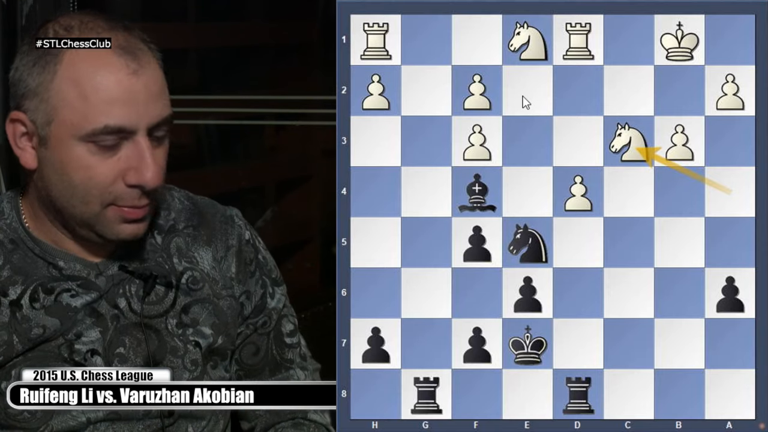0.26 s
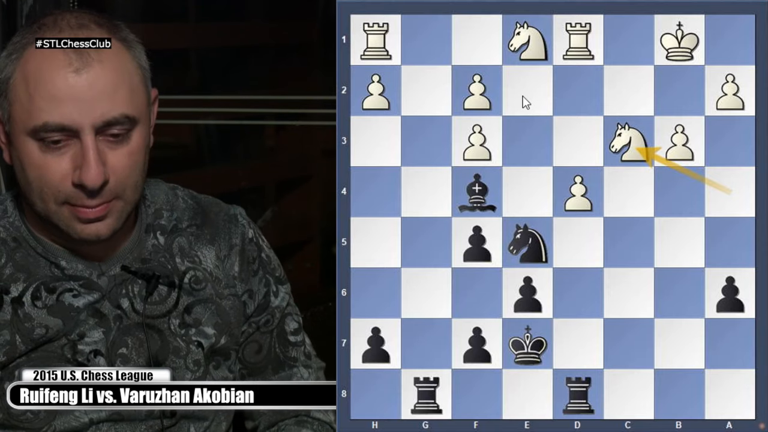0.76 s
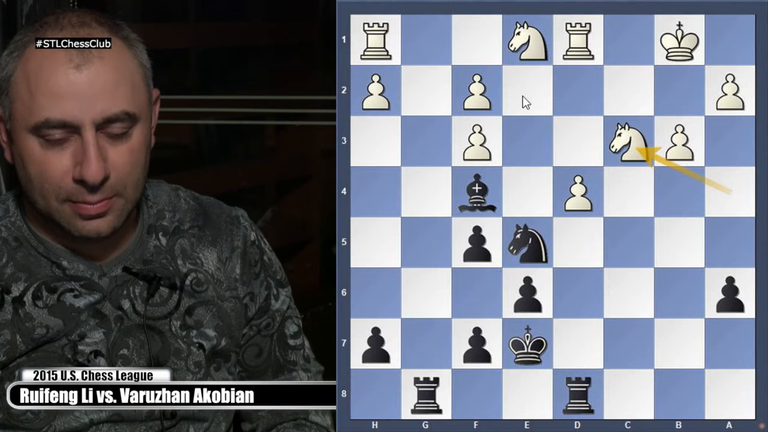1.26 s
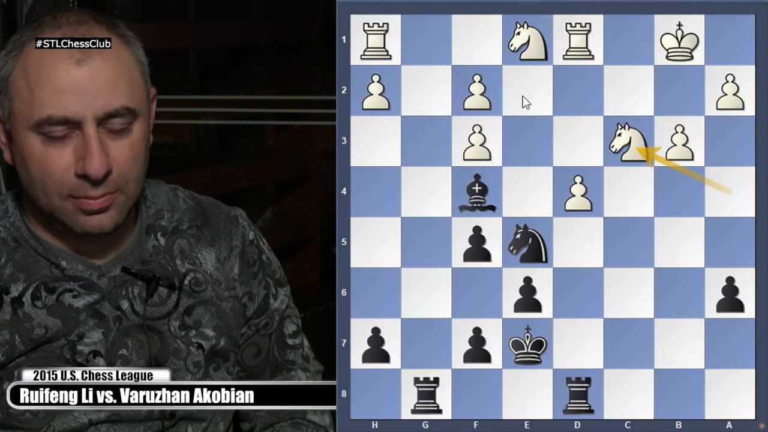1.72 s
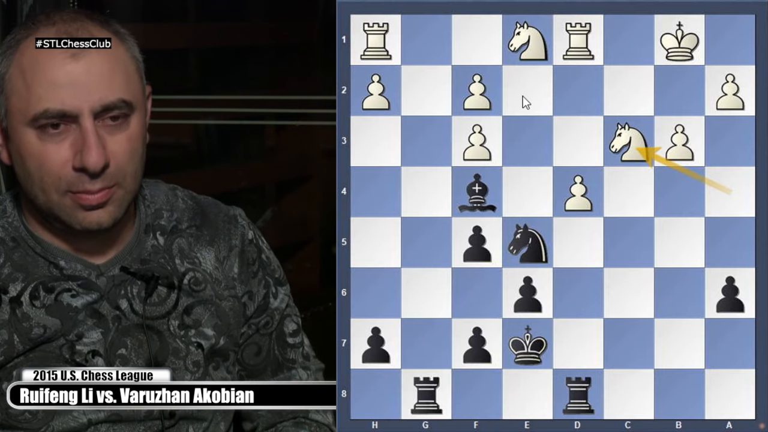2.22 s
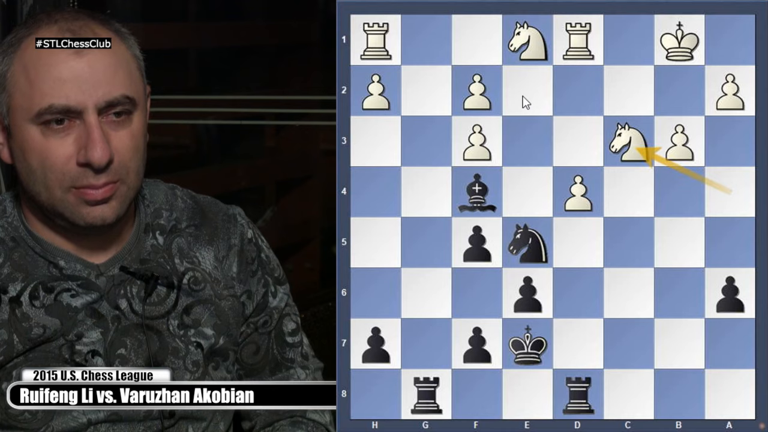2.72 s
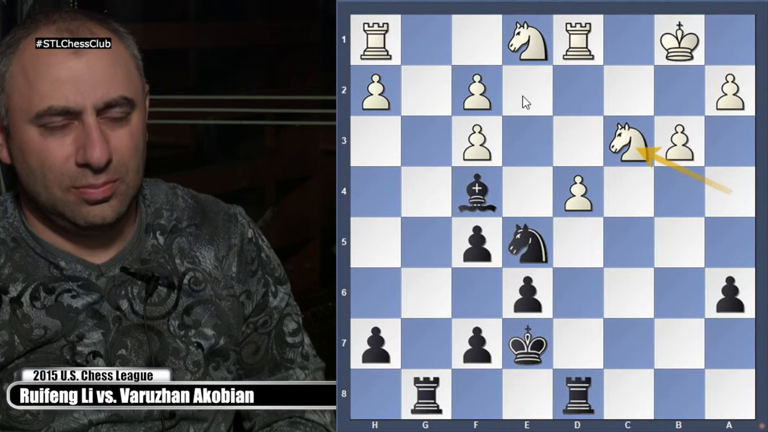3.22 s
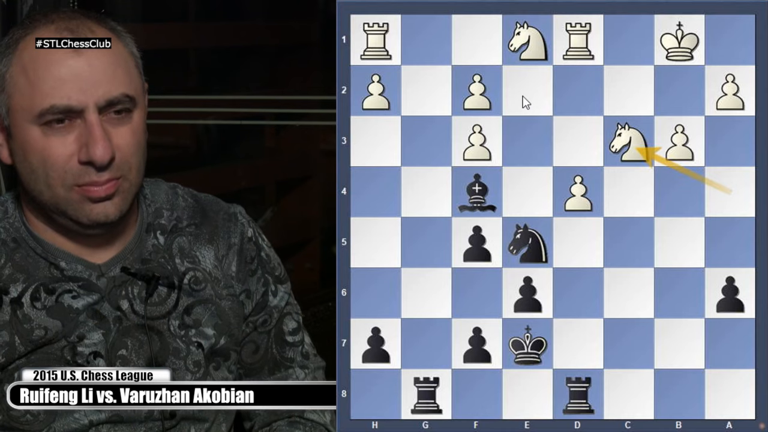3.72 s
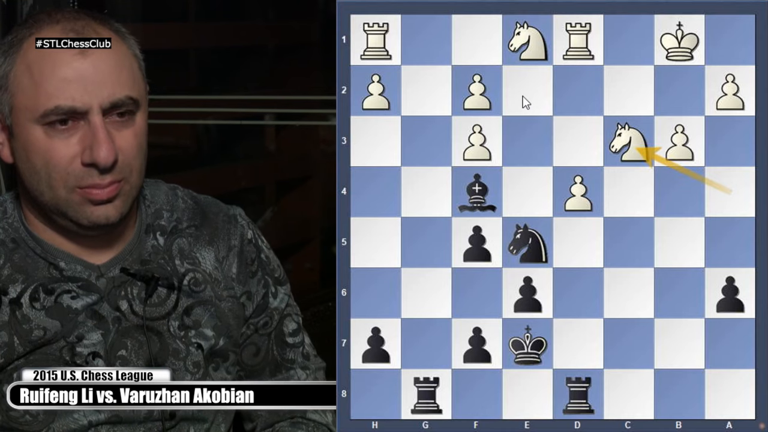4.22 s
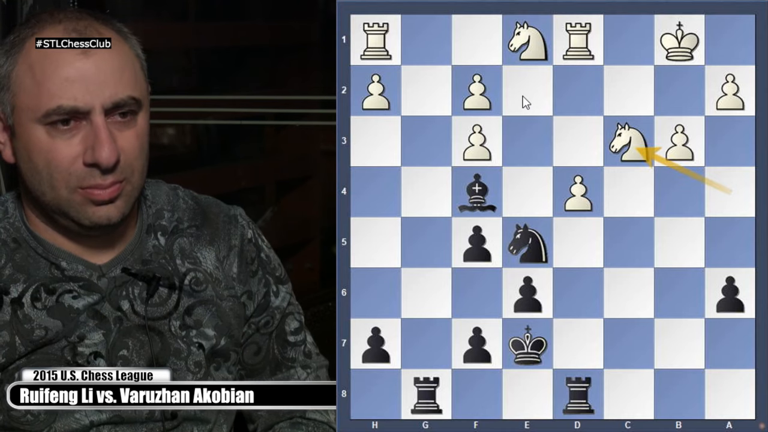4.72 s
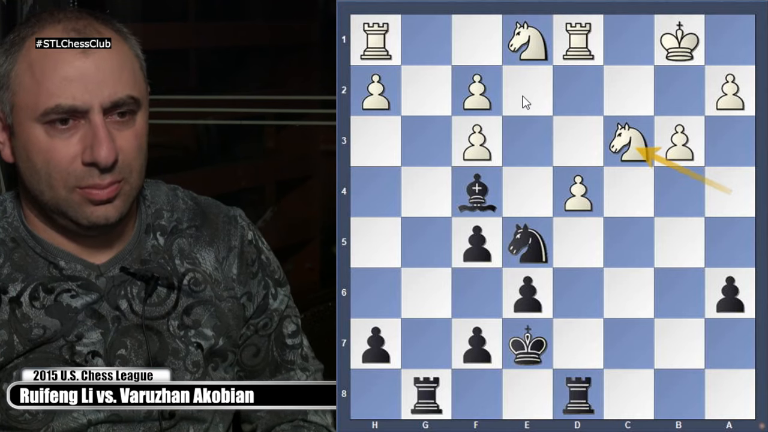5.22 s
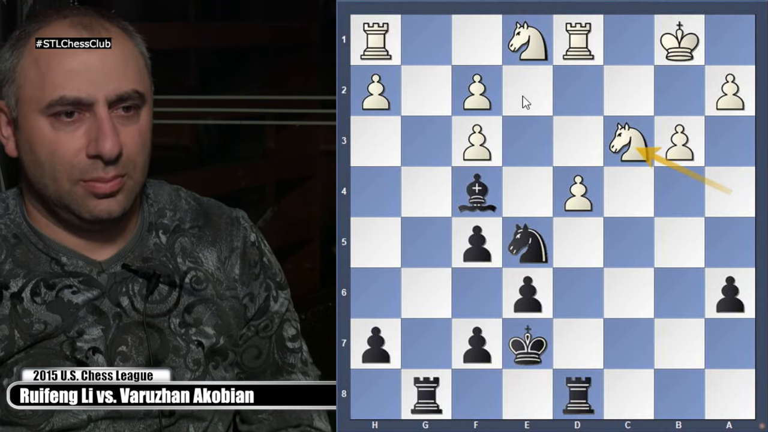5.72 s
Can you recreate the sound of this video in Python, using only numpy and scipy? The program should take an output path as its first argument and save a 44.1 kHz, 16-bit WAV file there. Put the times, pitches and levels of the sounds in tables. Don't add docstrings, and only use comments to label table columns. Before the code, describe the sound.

Over a low ventilation rumble, fingers softly tap and rub a sealed drink can. The tab clicks and a short bright gas burst escapes; after a pause another click starts a faint hiss with small metallic ticks. The lid breaks with a loud, clipped pop, ringing briefly in the room, then the slack can wall crinkles and dents. Close mono microphone.

```python
import sys
import numpy as np
from scipy import signal
from scipy.fft import rfft, irfft
from scipy.io import wavfile

SR = 44100
rng = np.random.default_rng(int(sys.argv[2]) if len(sys.argv) > 2 else 0)


def bounce(signal):
    frames = np.transpose(np.atleast_2d(signal))
    limited = np.clip(frames, -1, 1)
    pcm = np.round(limited * 32767).astype(np.int16)
    wavfile.write(sys.argv[1], SR, pcm)


def ratio_of_db(decibels):
    return 10 ** (np.asarray(decibels, float) / 20)


N = 262836

# [freq_hz, density_db_per_hz]
AIR_COLOUR = [(9.4, -26.5), (16, 5), (49, 0.5), (118, -19), (192, -22.5), (264, -21), (374, -28),
              (471, -26), (666, -33), (1090, -36.5), (2310, -47), (3260, -46.5), (4750, -52), (14700, -60),
              (16000, -68)]
AIR_LEVEL_DB = -38
# [freq_hz, t60_s]
ROOM_T60 = [(300, .5), (1300, .7), (2000, .78), (3000, .85), (4500, .65), (6000, .58), (9000, .57),
            (14000, .42)]
ROOM_DB, ROOM_GAP_S, EARLY_DB, EARLY_T60_S = -20, .002, 3, .2

# [freq_hz, width_hz, level_db]
RUB_RESONANCES = [(900, 700, -1), (2000, 900, -4), (3100, 900, -1), (4202, 1000, -6)]
# [start_s, length_s, friction_db, rustle_over_friction_db]
STROKES = [(.29, .005, -69, -1), (.37, .005, -76, 8), (.66, .1, -70, -15), (.83, .015, -57, -11),
           (.87, .17, -64, -6), (1.865, .045, -57, -9), (2.19, .04, -69, 0), (3.05, .55, -66, -10),
           (3.27, .06, -63, -7), (4.56, .05, -61, -6), (4.62, .05, -70, -5), (5.22, .01, -64, -8),
           (5.63, .01, -58, -14), (5.91, .07, -73, 3)]
GRIP_DB_PER_S, SLIP_DB_PER_S = 350, 200
# [start_s, length_s, level_db]
THUMP = (3.718, .03, -40.5)
THUMP_DB_PER_S = 900

# [freq_hz, width_hz]
SEALED_METAL = [(1700, 1600), (3800, 1900), (5300, 3000), (10800, 7000)]
# [freq_hz, width_hz]
SLACK_METAL = [(1700, 900), (2850, 950), (6000, 2000), (11000, 8000)]
# [start_s, knock_db, brightness_db, boom_over_knock_db]
TAPS = [(.364, -53, 0, 0), (.8243, -49, 0, -5), (1.87, -67, 8, 3), (1.9052, -43, -4, -22),
        (4.519, -78, 6, 36), (5.6179, -52, -9, -4)]
TAP_SIZZLE_DB, TAP_T60_S = -10, .04
# [start_s, knock_db, brightness_db, boom_over_knock_db]
DENTS = [(4.5427, -46, -11, -8), (4.5504, -41, -2, -6), (4.554, -43, -5, -7), (4.563, -46, -10, -6),
         (4.573, -47, -5, -7), (4.587, -42, -10, -8), (4.594, -35, -5, -6), (4.606, -44, -4, -3),
         (4.7968, -51, 0, -4), (5.0415, -42, -6, 7), (5.1352, -36, -11, -14), (5.1916, -34, -20, -6),
         (5.2236, -45, -11, -7), (5.4716, -28, -7, -8), (5.5201, -49, -13, -3), (5.5859, -48, -11, -24),
         (5.6415, -36, -18, -8), (5.6458, -29, -22, -14), (5.6658, -35, -21, -15), (5.7687, -62, 4, 0)]
DENT_SIZZLE_DB, DENT_T60_S = -11, .015
# [start_s, knock_db, brightness_db, sizzle_over_tick_db]
TICKS = [(1.0639, -33, 20, -18), (1.2133, -5, -10, -6), (1.2385, -18, -14, 0), (2.19, -54, 4, -10),
         (2.225, -54, 6, -10), (2.5694, -33, -8, -16), (2.5745, -23, -9, -12), (2.5874, -9, 5, -6),
         (2.6101, -20, 2, -16), (2.782, -47, 3, -3), (2.794, -45, 3, -10), (2.891, -38, -8, -4),
         (3.1585, -33, -4, -11), (3.2828, -36, -2, -9), (3.3577, -39, -5, -11), (3.6333, -29, -1, -7),
         (3.657, -37, -2, -9), (3.693, -25, -3, -5), (3.7583, -23, -1, 1), (3.7738, -27, 4, -2),
         (3.8226, -22, -3, -3), (3.8301, -26, 2, -3), (3.8379, -17, -3, -3)]
TICK_BOOM_DB, TICK_T60_S = -12.5, .01
# [start_s, freq_hz, level_db, t60_s]
RINGS = [(1.064, 5850, -22, .025), (1.064, 4490, -24, .015), (1.064, 1750, -37, .02),
         (1.2134, 570, -39, .04), (1.2385, 570, -37, .06), (2.5875, 590, -37, .04), (2.5745, 590, -41, .04),
         (2.5875, 12600, -18, .008), (3.774, 3500, -17, .025), (3.774, 3600, -35, .12),
         (4.519, 700, -45, .04), (4.55, 1650, -47, .15), (4.59, 1600, -46, .17), (4.594, 3200, -42, .1),
         (4.594, 6200, -52, .2), (5.0415, 1760, -42, .12), (5.0415, 1000, -46, .04),
         (5.4716, 2150, -29, .015), (5.135, 3100, -35, .025), (5.1916, 3130, -42, .05),
         (5.6415, 1690, -47, .06), (5.6415, 2650, -37, .05), (5.6458, 3340, -39, .03),
         (5.6658, 2740, -42, .04)]
MODE_SPREAD, MODE_RISE_S = .03, .0006

# [time_s, level_db]
VENT = [
    (1.1845, -55),
    (1.188, -34),
    (1.205, -26.5),
    (1.245, -25.5),
    (1.29, -44),
    (1.35, -62),
    (1.4, -80),
]
# [freq_hz, density_db_per_hz]
VENT_COLOUR = [(600, -32), (1600, -21), (2500, -16), (3400, -4), (4800, -2.5), (6800, -2), (9000, -1),
               (11500, -4), (15000, 0), (16500, -2)]
# [start_s, length_s, level_db, rise_db_per_s, fall_db_per_s]
BLEED = (1.29, .02, -51, 600, 95)
# [freq_hz, density_db_per_hz]
SPIT_COLOUR = [(1500, -22), (2500, -8), (4300, 0), (6200, 0), (8500, -4), (11500, -5), (13500, -13),
               (16000, -22)]
SPIT_FROM_S, SPIT_DB, SPIT_DB_PER_S = 2.58, -24, 420
# [start_s, length_s, level_db]
LEAK = (2.59, .385, -47.5)
LEAK_RISE_DB_PER_S, LEAK_CLOSE_DB_PER_S = 5000, 320
# [freq_hz, width_hz, level_db]
SLIT = [(2200, 700, -15), (3220, 800, -11), (4300, 700, -16), (5200, 700, -11), (6300, 800, -6),
        (7800, 1300, -6.5), (9300, 600, -17), (10600, 1400, -8), (12700, 900, -10), (14100, 1100, -15),
        (15300, 900, -22)]
# [time_s, level_db, rise_db_per_s, fall_db_per_s]
HEADSPACE = (2.79, -46.5, 85, 65)
HEADSPACE_HZ, HEADSPACE_WIDTH_HZ = 640, 440

# [start_s, boom_db, knock_db, tick_db, sizzle_db, t60_s]
POP = (3.8406, -6, 3.5, 0, -2, .028)
# [freq_hz, level_db, t60_s]
LID_MODES = [(520, -18, .05), (1050, -19, .04), (1400, -12, .04), (1650, -16, .03), (2170, -12, .03),
             (2600, 1, .025), (3200, 9, .02), (3700, -8, .022), (6300, -4, .015)]
# [freq_hz, level_db]
BLAST = [(300, -20), (600, -13), (900, -10), (1300, -1), (1800, -7), (2500, -3), (3100, .5), (4000, -4),
         (4600, -9), (6300, -3), (8000, -10.5), (10000, -13), (13000, -18), (15500, -24)]
BLAST_DB = 39


def rms_one(x):
    return x / np.sqrt(np.mean(x ** 2) + 1e-20)


def add(out, sound, start_s):
    at = round(start_s * SR)
    out[at:at + len(sound)] += sound[:N - at]


def at_hz(points, hz):
    point_hz, value = np.transpose(points)
    return np.interp(np.log(np.maximum(hz, 1)), np.log(point_hz), value)


def coloured(spectrum):
    gain = ratio_of_db(at_hz(spectrum, np.fft.rfftfreq(N, 1 / SR)))
    return rms_one(irfft(rfft(rng.standard_normal(N)) * gain, N))


def resonate(x, hz, width_hz):
    r = np.exp(-np.pi * width_hz / SR)
    poles = [1, -2 * r * np.cos(2 * np.pi * hz / SR), r * r]
    return signal.lfilter([(1 - r * r) / 2, 0, (r * r - 1) / 2], poles, x)


def resonant_noise(rows):
    drive = rng.standard_normal(N)
    out = np.zeros(N)
    for k, (hz, width_hz, db) in enumerate(rows):
        band = resonate(resonate(drive, hz, width_hz), hz, width_hz)
        out += (-1) ** k * ratio_of_db(db) * band
    return rms_one(out)


def flutter(rate_hz, depth_db):
    r = np.exp(-2 * np.pi * rate_hz / SR)
    drift = signal.lfilter([1], [1, -2 * r, r * r], rng.standard_normal(N + SR))[SR:]
    return ratio_of_db(depth_db * rms_one(drift))


def swell(start_s, length_s, db, rise_db_per_s, fall_db_per_s):
    t = np.arange(N) / SR
    before_s = np.maximum(start_s - t, 0)
    after_s = np.maximum(t - start_s - length_s, 0)
    return ratio_of_db(db - rise_db_per_s * before_s - fall_db_per_s * after_s)


def ventilation():
    return ratio_of_db(AIR_LEVEL_DB) * coloured(AIR_COLOUR)


def room(x, size=40000):
    t = np.arange(size) / SR
    edges_hz = 200 * 2 ** np.arange(0, 6.6, 1 / 3)
    tail = np.zeros(size)
    for low, high in zip(edges_hz, edges_hz[1:]):
        band_filter = signal.butter(2, [low, high], "band", fs=SR, output="sos")
        band = signal.sosfilt(band_filter, rng.standard_normal(size))
        tail += band * ratio_of_db(-60 * t / at_hz(ROOM_T60, np.sqrt(low * high)))
    tail *= np.clip(t / ROOM_GAP_S - 1, 0, 1) * (1 + ratio_of_db(EARLY_DB - 60 * t / EARLY_T60_S))
    return signal.fftconvolve(x, tail / np.sqrt(np.sum(tail ** 2)))[:N]


def fingers():
    dull = resonant_noise(RUB_RESONANCES)
    fine = coloured([(3000, -28), (5000, -1.5), (7000, -4), (15000, -21)])
    grain = flutter(40, depth_db=2.4)
    out = swell(*THUMP, THUMP_DB_PER_S, THUMP_DB_PER_S) * resonant_noise([(160, 120, 0)])
    for start_s, length_s, db, rustle_db in STROKES:
        stroke = swell(start_s, length_s, db, GRIP_DB_PER_S, SLIP_DB_PER_S)
        out += grain * stroke * (dull + ratio_of_db(rustle_db) * fine)
    return out


def puff():
    time_s, level_db = np.transpose(VENT)
    burst = ratio_of_db(np.interp(np.arange(N) / SR, time_s, level_db, left=-150, right=-150))
    spits = swell(*BLEED)
    for start_s, knock_db, *_ in TICKS:
        if start_s > SPIT_FROM_S:
            spits += swell(start_s, 0, knock_db + SPIT_DB, 20000, SPIT_DB_PER_S)
    return (burst * coloured(VENT_COLOUR) + spits * coloured(SPIT_COLOUR)) * flutter(60, depth_db=1.2)


def leak():
    start_s, length_s, db = LEAK
    flow = swell(start_s, length_s, 0, LEAK_RISE_DB_PER_S, LEAK_CLOSE_DB_PER_S)
    jet = ratio_of_db(db) * flow * resonant_noise(SLIT) * flutter(30, depth_db=1.2)
    widest_s, hollow_db, rise, fall = HEADSPACE
    hollow = resonant_noise([(HEADSPACE_HZ, HEADSPACE_WIDTH_HZ, 0)])
    return jet + swell(widest_s, 0, hollow_db, rise, fall) * flow * hollow


def strike(metal, boom_db, knock_db, tick_db, sizzle_db, t60_s):
    t = np.arange(3000) / SR
    force = rng.standard_normal(len(t)) * (ratio_of_db(-60 * t / t60_s) + ratio_of_db(-22 - 60 * t / .04))
    force[0] = 3.0
    peaks_db = (boom_db - 3, knock_db + 1.5, tick_db + .8, sizzle_db + 2.5)
    out = np.zeros(len(t))
    for (hz, width_hz), db in zip(metal, peaks_db):
        band = resonate(resonate(force, hz, width_hz), hz, width_hz)
        out += ratio_of_db(db) * band / np.max(np.abs(band))
    return out


def mode(hz, level_db, t60_s):
    t = np.arange(8000) / SR
    close_hz = hz * (1 + MODE_SPREAD * rng.uniform(-1, 1, (4, 1)))
    tones = np.sum(np.sin(2 * np.pi * close_hz * t), axis=0)
    return ratio_of_db(level_db - 9 - 60 * t / t60_s) * (1 - np.exp(-t / MODE_RISE_S)) * tones


def contact(out, start_s, knock_db, bright_db, boom_db, sizzle_db, t60_s):
    metal = SEALED_METAL if start_s < POP[0] else SLACK_METAL
    tick_db = knock_db + bright_db
    add(out, strike(metal, knock_db + boom_db, knock_db, tick_db, tick_db + sizzle_db, t60_s), start_s)


def clicks():
    out = np.zeros(N)
    for start_s, knock_db, bright_db, sizzle_db in TICKS:
        contact(out, start_s, knock_db, bright_db, TICK_BOOM_DB, sizzle_db, TICK_T60_S)
    for row in DENTS:
        contact(out, *row, DENT_SIZZLE_DB, DENT_T60_S)
    for row in TAPS:
        contact(out, *row, TAP_SIZZLE_DB, TAP_T60_S)
    for start_s, *ring in RINGS:
        add(out, mode(*ring), start_s)
    return out


def blast(size=512):
    out = np.zeros(N)
    pulse = irfft(ratio_of_db(BLAST_DB + at_hz(BLAST, np.fft.rfftfreq(size, 1 / SR))), size)
    add(out, np.roll(pulse, 100), POP[0])
    return out


def pop():
    out = np.zeros(N)
    start_s, *impact = POP
    add(out, strike(SEALED_METAL, *impact), start_s)
    for ring in LID_MODES:
        add(out, mode(*ring), start_s)
    return out


def scene():
    can = clicks() + puff() + leak()
    reverb = ratio_of_db(ROOM_DB) * room(can + blast())
    return (ventilation() + reverb + fingers() + can + pop())[None]


def roll_off(x):
    return signal.sosfilt(signal.butter(12, 16210, fs=SR, output="sos"), x)


def record(dry):
    low_pass = signal.cheby2(10, 50, 16300, fs=SR, output="sos")
    mix = np.clip(signal.sosfilt(low_pass, dry), -.98, .98)
    return roll_off(mix)


dry = scene()
out = record(dry)
bounce(out)
```